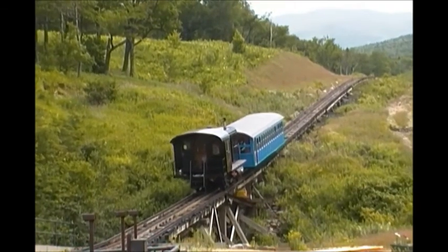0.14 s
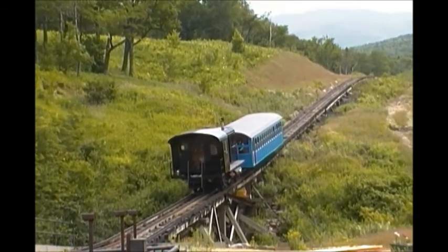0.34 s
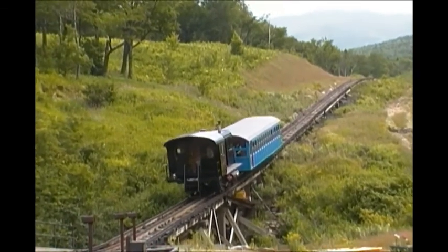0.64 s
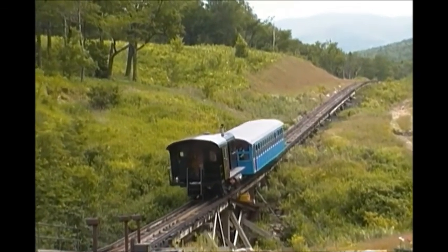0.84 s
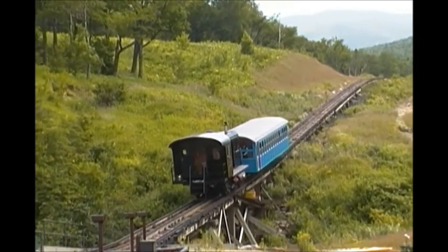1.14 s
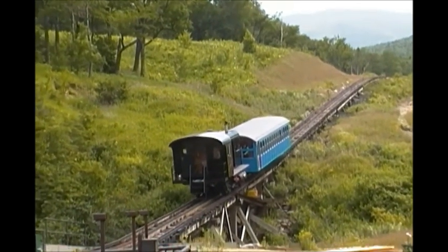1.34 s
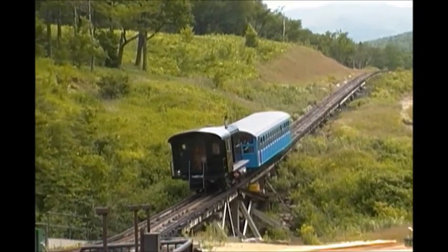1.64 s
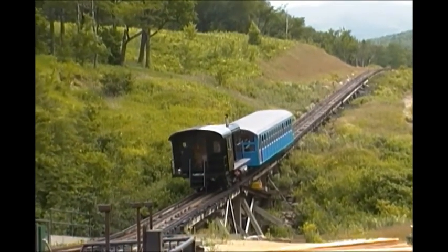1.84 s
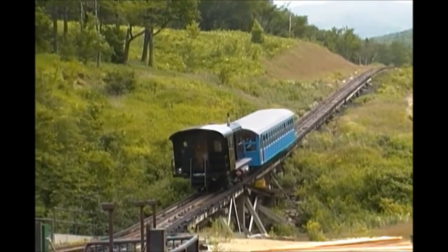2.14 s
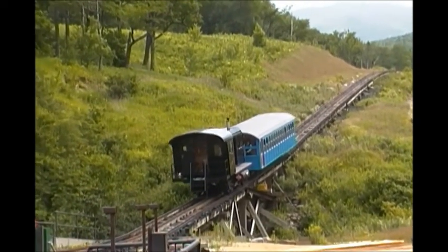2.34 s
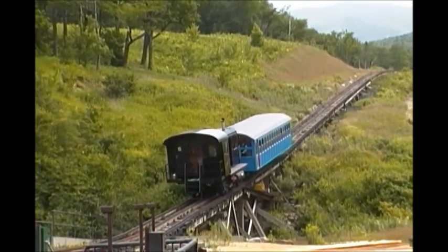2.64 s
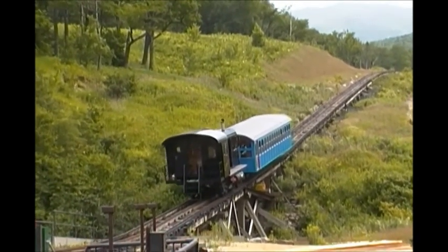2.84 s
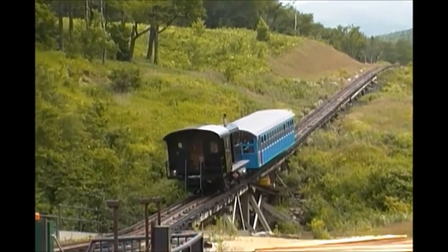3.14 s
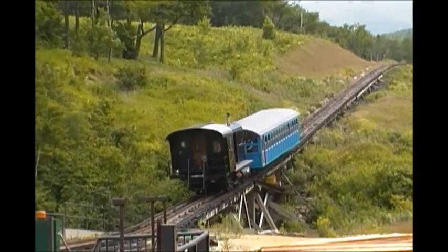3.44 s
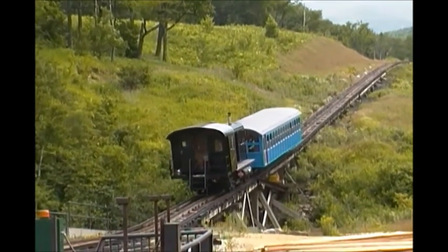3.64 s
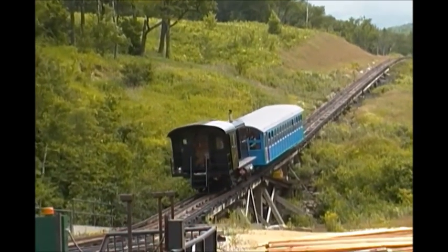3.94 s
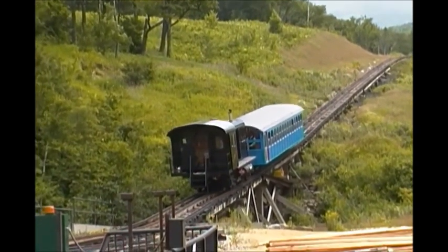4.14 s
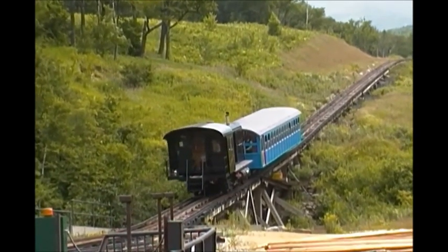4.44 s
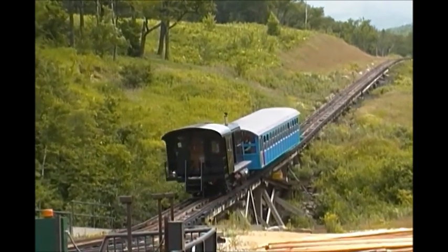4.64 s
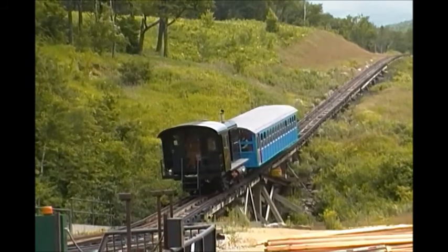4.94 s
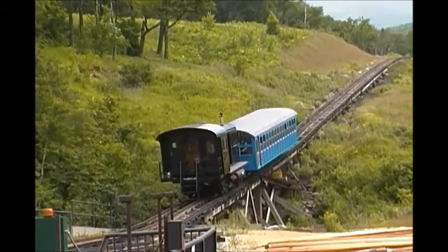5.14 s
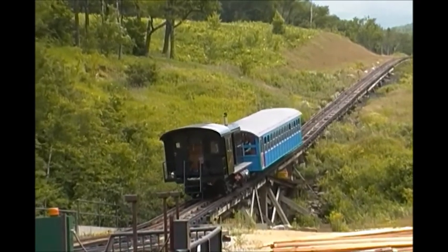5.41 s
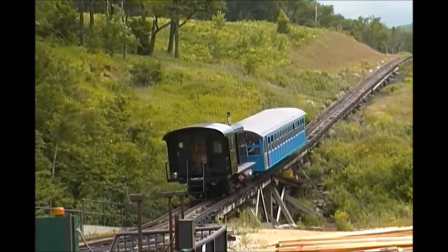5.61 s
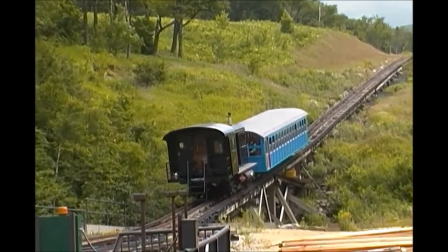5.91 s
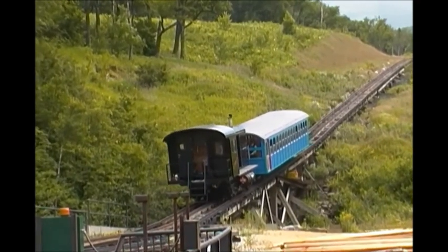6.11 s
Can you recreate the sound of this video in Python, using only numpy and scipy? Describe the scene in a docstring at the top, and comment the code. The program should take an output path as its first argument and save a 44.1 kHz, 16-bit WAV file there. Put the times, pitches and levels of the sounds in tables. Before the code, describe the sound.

Outdoors beside a hillside track, a diesel rack engine and coach creep downhill. A constant mid-range roar full of fine cog rattle sits over low rumble and a humming engine. Steel parts ping, loose metal jangles briefly and compressed air hisses in puffs. The roar grows fuller after the middle while the engine note sinks slightly. Stereo microphones at some distance, with small quick level dips and left-right shifts.

```python
"""Rack train on a trestle

A diesel rack locomotive and its coach creep down a timber trestle some way off, outdoors.
Sine waves locked to one shaft make the engine, fan and pump; others make an idling engine and singing gears.
Shaped noise makes the roar of cooling air, the low rumble, jangling metal and puffs of vented air.
Random knocks on ringing steel make the cog rattle, and single steel parts ping over it."""
import sys
import numpy as np
from scipy import signal
from scipy.fft import rfft, irfft, next_fast_len
from scipy.io import wavfile
from scipy.ndimage import uniform_filter1d, map_coordinates

SR = 44100
rng = np.random.default_rng(int(sys.argv[2]) if len(sys.argv) > 2 else 0)


def linear_from_db(decibels):
    """Turn decibels (scalar or array-like) into linear amplitude factors; 0 gives 1."""
    return 10 ** (np.asarray(decibels, float) / 20)


def unload_wav(signal):
    """Save mono or channel-first audio to the path in sys.argv[1] as 16-bit WAV at rate SR, clipped to [-1, 1]."""
    wavfile.write(
        sys.argv[1],
        SR,
        np.round(np.clip(np.atleast_2d(signal).T, -1, 1) * 32767).astype(np.int16),
    )


N = 276507  # length in samples


def unit(x):
    """Scale to an rms of 1."""
    return x / np.sqrt(np.mean(x ** 2) + 1e-20)


def clock():
    """The time of every sample in seconds."""
    return np.arange(N) / SR


def along(points, hz):
    """Read a table of (Hz, value) points on a logarithmic frequency axis."""
    f, v = np.transpose(points)
    return np.interp(np.log(hz + 1), np.log(f + 1), v)


def curves(rows):
    """Join the rows by straight lines: one value per sample for each column after the time."""
    s, *columns = np.transpose(rows)
    return [np.interp(clock(), s, column) for column in columns]


def wobble(rate):
    """A smooth random curve through this many random points a second."""
    points = rng.standard_normal(int(N * rate / SR) + 4)
    return map_coordinates(points, [np.arange(N) * rate / SR])


def filtered(x, response):
    """Multiply the spectrum of x by a function of frequency."""
    m = next_fast_len(N + SR // 2)
    gain = response(np.fft.rfftfreq(m, 1 / SR))
    return irfft(rfft(x, m) * gain, m)[..., :N]


# How alike left and right are. Each row: frequency in Hz, likeness (1 is identical, 0 unrelated).
LIKENESS = [(30, 0.44), (70, 0.93), (150, 0.98), (1200, 0.99), (2500, 0.96), (4000, 0.92), (6000, 0.67),
            (9000, 0.2)]


def spread(pair, spectrum):
    """Colour two unrelated signals and mix them into a left and right of the wanted likeness, rms 1."""
    def response(hz):
        turn = np.arccos(np.clip(along(LIKENESS, hz), -1, 1)) / 2
        return linear_from_db(along(spectrum, hz)) * [np.cos(turn), np.sin(turn)]

    mid, side = filtered(pair, response)
    return unit(np.array([mid + side, mid - side]))


def rush(spectrum, patchy_db):
    """Stereo noise of rms 1, with patches in time and frequency of random gain."""
    z = signal.stft(rng.standard_normal((2, N)), nperseg=512)[2]
    field = rng.standard_normal(z.shape[1:])
    field = uniform_filter1d(field, size=8, axis=0)
    field = uniform_filter1d(field, size=12, axis=1)
    patchy = signal.istft(z * linear_from_db(patchy_db * unit(field)), nperseg=512)[1]
    return spread(patchy[:, :N], spectrum)


def tones(rate_hz, orders, levels_db, waver_db, drift):
    """Sines at multiples of a rate, wavering in level and phase (drift in radians), left and right a little apart."""
    turns = np.cumsum(rate_hz) / SR
    total = 0
    for order, db in zip(orders, levels_db):
        level = np.sqrt(2) * linear_from_db(db + waver_db * wobble(6))
        phase = 2 * np.pi * (order * turns + rng.random()) + drift * wobble(5)
        apart = np.outer([1, -1], 0.084 * wobble(2.8))
        total = total + level * np.sin(phase + apart)
    return total


# Colour of the rumble. Each row: frequency in Hz, relative level in dB.
RUMBLE_COLOUR = [(12, -9), (25, -7), (33, -8.5), (48, -1.5), (60, -1), (110, 2), (200, 1.5), (240, -2),
                 (305, -3.5), (325, -7), (420, -9.5), (560, -40), (900, -120)]


def rumble():
    """Wheels and the timber trestle drone as low noise that swings slowly in level."""
    level_db, swing_db = -19.5, 1.1
    return linear_from_db(level_db + swing_db * wobble(3.83)) * rush(RUMBLE_COLOUR, patchy_db=0.5)


# Strength of the idling engine. Each row: time in seconds, change in dB.
IDLER_CHANGE = [(0, 2), (.7, 1), (2.7, -1.5), (5, 1), (5.7, -2), (6.27, 1)]
# Its harmonics 1, 2, and so on: level of each in dB, before that change.
IDLER_HARMONICS_DB = [-33, -25.5, -34.5, -33.5, -52, -34.5]


def idling_engine():
    """A second engine near by keeps its own steady pace and sounds as a row of harmonics."""
    rate_hz = np.full(N, 36.47)
    orders = np.arange(len(IDLER_HARMONICS_DB)) + 1
    return linear_from_db(curves(IDLER_CHANGE)[0]) * tones(rate_hz, orders, IDLER_HARMONICS_DB, waver_db=3.0, drift=0.4)


# The steady air leak. Each row: time in seconds, hiss level in dB.
LEAK_LEVEL = [(0, -42), (.6, -42.5), (1.5, -38), (3.35, -39), (3.6, -39.5), (6.27, -38.5)]
# Puffs of vented air. Each row: start in seconds, hold in seconds, hiss level in dB, sizzle over hiss in dB.
PUFFS = [(0.714, .3, -43.5, -4.5), (1.62, .07, -39.5, -5), (2.057, .5, -37.5, -3), (3.52, .12, -44, -13),
         (4.42, 0.04, -42, -6), (4.656, .25, -40.5, -4), (5.103, 0.14, -43, -6.5), (5.9, 0.15, -39.5, -15)]
# Colour of the hiss. Each row: frequency in Hz, relative level in dB.
HISS_COLOUR = [(2500, -120), (5200, -3.5), (6000, -5.5), (6500, -0.5), (7300, 2.5), (8300, -4.5),
               (9200, -12), (10200, -40), (16000, -120)]
# Colour of the higher sizzle. Each row: frequency in Hz, relative level in dB.
SIZZLE_COLOUR = [(5000, -120), (8000, -3.5), (9000, 0), (10000, 1.5), (10800, -19), (11500, -29),
                 (16000, -120)]


def air():
    """Compressed air leaks and vents in puffs as bright, wide noise, each puff with its own share of sizzle."""
    t = clock()
    rise_s, fall_s, leak_sizzle_db = 0.038, 0.068, -14.5
    leak = linear_from_db(curves(LEAK_LEVEL)[0])
    # unrelated noises add by power
    hiss_power = leak ** 2
    sizzle_power = (linear_from_db(leak_sizzle_db) * leak) ** 2
    for s, hold, db, over_db in PUFFS:
        puff = np.clip((t - s) / rise_s, 0, 1) * np.exp(-np.maximum(t - s - hold, 0) / fall_s)
        hiss_power = hiss_power + (linear_from_db(db) * puff) ** 2
        sizzle_power = sizzle_power + (linear_from_db(db + over_db) * puff) ** 2
    hiss = np.sqrt(hiss_power) * rush(HISS_COLOUR, patchy_db=1.4)
    sizzle = linear_from_db(1.3 * wobble(8)) * np.sqrt(sizzle_power) * rush(SIZZLE_COLOUR, patchy_db=3.0)
    return linear_from_db(0.63 * wobble(10)) * (hiss + sizzle)


# Bursts of loose metal shaking. Each row: middle in seconds, level in dB, length in seconds.
JANGLE_BURSTS = [(0.44, -29, 0.012), (1.67, -39, .015), (2.089, -25.5, .02), (3.956, -26.5, 0.016),
                 (5.2, -24.5, .025), (5.34, -26, 0.023), (5.941, -20.5, 0.0098)]
# Colour of the bursts. Each row: frequency in Hz, relative level in dB.
JANGLE_COLOUR = [(800, -120), (1500, -4.5), (3000, -1), (5000, -5), (7500, -13.5), (9500, -22.5),
                 (14000, -120)]


def jangles():
    """Loose metal shakes: each burst of noise swells and fades within a few hundredths of a second."""
    t = clock()
    swell = sum(linear_from_db(db) * np.exp(-((t - s) / length) ** 2) for s, db, length in JANGLE_BURSTS)
    return swell * rush(JANGLE_COLOUR, patchy_db=4.0)


# Single steel parts that ring. Each row: start in seconds, frequency in Hz, level in dB.
PING_PARTS = [(.025, 2660, -20), (.35, 2650, -21), (.745, 2680, -16.5), (3.61, 624, -14.5),
              (3.69, 4200, -27.5), (3.74, 579, -16), (4.03, 4200, -28), (4.925, 4205, -25),
              (5.13, 4200, -25), (5.17, 1295, -20)]
# How long they ring. Each row: frequency in Hz, time to fall by 60 dB in seconds.
PING_RING = [(600, .33), (2600, 0.12), (4200, 0.28)]


def pings():
    """Each steel part starts softly at this distance and rings as a fading, slightly unsteady sine."""
    t = clock()
    out = np.zeros(N)
    for s, hz, db in PING_PARTS:
        age = np.maximum(t - s, 0)
        fade = linear_from_db(db - 60 * age / along(PING_RING, hz))
        soft_start = 1 - np.exp(-age / 0.0034)
        out += fade * soft_start * np.sin(2 * np.pi * hz * t + 1.4 * wobble(30))
    return out


# Two singing gear pairs. Each row: time in seconds, level of the first in dB, level of the second in dB.
GEAR_LEVELS = [(0, -33, -59), (2, -30, -62), (3.6, -37.5, -59), (5.7, -46, -47), (5.85, -51, -25.5),
               (6.27, -53, -30)]
# Fast random pitch scatter in Hz, first gear pair then second.
GEAR_SCATTER_HZ = [7.05, 12]


def gears():
    """Gears sing as fuzzy tones, since tooth contact varies; one fades and later the other comes."""
    out = 0
    for hz, scatter_hz, db in zip((540.3, 704), GEAR_SCATTER_HZ, curves(GEAR_LEVELS)):
        pitch = hz + scatter_hz * wobble(30)
        out = out + linear_from_db(db + 2.5 * wobble(20)) * tones(pitch, [1], [0], waver_db=3.0, drift=.8)
    return out


# Ringing tones of the panels and rack. Each row: frequency in Hz, relative level in dB,
# time to fall by 60 dB in seconds.
STEEL_MODES = [(553.5, -3, 0.12), (629, -3.5, 0.11), (1027, -4.5, .08), (1104, -2.5, 0.08),
               (1348, -3, 0.15), (1599, 0.5, 0.064), (2035, -8, .06), (2650, -5.5, 0.065),
               (3094, -5.5, .05), (3610, -20, 0.036), (4200, -13, 0.073), (4810, -13.5, 0.089)]


def rattle(per_second, scatter_db):
    """Cog teeth, pins and loose panels knock: each steel tone is struck at random times and strengths."""
    t = np.arange(SR // 5) / SR
    out = np.zeros((2, N))
    for hz, db, t60 in STEEL_MODES:
        strength = linear_from_db(scatter_db * rng.standard_normal((2, N)))
        knocks = (rng.random((2, N)) < per_second / SR) * strength
        ring = linear_from_db(db - 60 * t / t60) * np.sin(2 * np.pi * hz * t)
        out += signal.fftconvolve(knocks, [ring], axes=1)[:, :N]
    return spread(out, [(100, 0)])  # no extra colour


# Strength of the roar. Each row: time in seconds, level in dB.
ROAR_LEVEL = [(0, -19), (.3, -18), (.45, -16.5), (.56, -19.5), (.75, -18.5), (1.02, -16), (1.25, -18.5),
              (1.7, -15.5), (1.9, -18), (2.15, -15.5), (2.5, -16), (3.1, -16), (3.35, -18), (3.6, -15),
              (3.85, -18.5), (3.96, -15), (4.2, -17.5), (4.9, -17), (5.22, -13.5), (5.4, -16), (5.72, -17),
              (5.86, -15), (6.13, -18), (6.27, -17.5)]
# Colour of the roar while the train is farther off. Each row: frequency in Hz, relative level in dB.
FAR_COLOUR = [(250, -33), (420, -12.5), (490, -10), (547, -5), (640, -4.5), (850, -12.5), (1020, -4.5),
              (1250, -9), (1700, -8), (1900, -13.5), (2080, -11), (2340, -15.5), (2690, -13), (2900, -15),
              (3600, -17.5), (4450, -21.5), (5050, -23.5), (5550, -28.5), (5800, -30), (6500, -33),
              (8450, -43), (14300, -120)]
# Colour of the roar when it is nearer. Each row: frequency in Hz, relative level in dB.
NEAR_COLOUR = [(250, -20.5), (420, -4.5), (470, -4.5), (600, -3), (690, -2), (816, -7.5), (960, -1.5),
               (1300, -5), (1850, -8), (2110, -5.5), (2340, -12), (2560, -8.5), (2850, -12), (3600, -14),
               (4500, -18.5), (5050, -20), (5550, -27), (5800, -26.5), (6500, -27.5), (8450, -40.5),
               (14300, -120)]
# The change between them. Each row: time in seconds, share of the nearer colour (0 to 1).
NEAR_SHARE = [(3.4, 0.0055), (4.8, 1)]
# Treble of the roar. Each row: time in seconds, change in dB.
TREBLE_CHANGE = [(0, -1), (.8, 1), (1.3, 0), (2.5, .5), (3.3, -1.5), (3.6, 0), (4.2, 1.5), (5.2, 0),
                 (6.27, 1.5)]


def roar():
    """Cooling air and gear noise roar through the body, with the rattle; the colour shifts as it nears."""
    near = np.clip(curves(NEAR_SHARE)[0], 0, 1)
    far_body = np.sqrt(1 - near) * rush(FAR_COLOUR, patchy_db=0.14)
    near_body = np.sqrt(near) * rush(NEAR_COLOUR, patchy_db=0.3)
    whole = unit(far_body + near_body + linear_from_db(-8.5) * rattle(per_second=60, scatter_db=3.5))
    treble = filtered(whole, lambda hz: hz ** 4 / (hz ** 4 + 2600 ** 4))
    shake_db = 0.37 * wobble(16) + 0.78 * wobble(8)  # the roar and rattle shudder together
    treble_extra = (linear_from_db(curves(TREBLE_CHANGE)[0]) - 1) * treble
    return linear_from_db(curves(ROAR_LEVEL)[0] + shake_db) * (whole + treble_extra)


# Engine speed. Each row: time in seconds, firing rate in Hz.
FIRING_RATE = [(0, 94.4), (3.3, 94.4), (3.8, 93.6), (4.1, 92.7), (4.4, 91.2), (4.7, 90.1), (5, 89.5),
               (5.3, 89), (5.6, 88.7), (6.27, 88.4)]
# Load on the parts. Each row: time in seconds, then the change in dB of exhaust, fan, pump and pump overtones.
PART_LOAD = [(0, -2.5, -4.5, -0.5, -3), (2.3, -0.5, -3.5, 0.5, 2.5), (3.7, -2, 0, -2, 1.5),
             (4.5, -6.5, -3.5, -11.5, -19), (5.2, -6, -1.5, -5.5, -18), (6.27, -5.5, -4, -5.5, 0)]
# Exhaust tones as multiples of the firing rate.
EXHAUST_MULTIPLES = [8 / 9, 0.99, 14 / 9, 2, 8 / 3]
# Level of each exhaust tone in dB, before the load change.
EXHAUST_LEVELS_DB = [-35.5, -20, -33, -22, -30.5]
# Levels of the pump's harmonics 2, 3 and 4 in dB, before the load change.
PUMP_OVERTONES_DB = [-36, -36, -40.5]


def engine():
    """Exhaust beats, fan blades and pump pistons follow one shaft, so they all slow together."""
    firing, = curves(FIRING_RATE)
    exhaust_db, fan_db, pump_db, overtone_db = curves(PART_LOAD)
    fan_hz, pump_hz = 2.4455 * firing, 2.1755 * firing
    exhaust = linear_from_db(exhaust_db) * tones(firing, EXHAUST_MULTIPLES, EXHAUST_LEVELS_DB, waver_db=2.5, drift=.2)
    fan = linear_from_db(fan_db) * tones(fan_hz, [1], [-26], waver_db=2.5, drift=0.13)
    pump = linear_from_db(pump_db) * tones(pump_hz, [1], [-21], waver_db=2.0, drift=0.2)
    orders = np.arange(len(PUMP_OVERTONES_DB)) + 2
    overtones = linear_from_db(overtone_db) * tones(pump_hz, orders, PUMP_OVERTONES_DB, waver_db=1.6, drift=0.35)
    return exhaust + fan + pump + overtones


# Brief drops of the whole level. Each row: time in seconds, depth in dB.
LEVEL_DIPS = [(.83, 2.5), (1.389, 3), (1.74, 2.5), (2.39, 5), (2.58, 4.5), (2.822, 3), (4.0, 1.5),
              (5.226, 3.5)]


def dips():
    """The whole level drops at once and creeps back, mostly within about a tenth of a second."""
    t = clock()
    drop_db = sum(depth_db * (t >= s) * np.exp(-np.abs(t - s) / 0.063) for s, depth_db in LEVEL_DIPS)
    return linear_from_db(-drop_db)


# Lean of the whole sound. Each row: time in seconds, left minus right in dB.
LEAN = [(0.0, -4.5), (0.1, 3.5), (0.42, -2.0), (0.56, 5), (0.61, 0.5), (1.19, 0.5), (1.22, 2), (1.5, 0.0),
        (2.06, 1.5), (2.16, -2.0), (2.97, 2), (3.04, -2.0), (3.12, 0.5), (3.27, -0.5), (3.34, 3.5),
        (3.42, 0.0), (4.16, 1.5), (4.19, -1.5), (4.26, 3), (4.8, 3.0), (4.85, -0.5), (5.9, 3.0),
        (5.97, 0.0), (6.27, 3.0)]


def lean():
    """The whole sound leans to the left or right, sometimes quickly and sometimes slowly."""
    return linear_from_db(np.outer([.5, -.5], curves(LEAN)[0]))


def scene():
    """All sources together in the open air."""
    background = rumble() + idling_engine() + air()
    train = jangles() + pings() + gears() + roar() + engine()
    return lean() * dips() * (background + train)


# Difference between the two microphones. Each row: frequency in Hz, left minus right in dB.
MICROPHONE_TILT = [(40, -1.5), (220, -0.1), (810, 0), (2960, -0.5), (7000, 0.5), (9000, -4)]


def microphones(x):
    """Two slightly unequal microphones favour left or right by frequency."""
    return filtered(x, lambda hz: linear_from_db(np.outer([.5, -.5], along(MICROPHONE_TILT, hz))))


def band_limit(x):
    """A steep low-pass at the top of the band."""
    return signal.sosfilt(signal.butter(12, 11470, fs=SR, output="sos"), x)


def record(dry):
    """Two microphones feed an input that overloads softly."""
    x = microphones(dry)
    mix = x / (1 + np.abs(x / 1.2) ** 8) ** (1 / 8)
    return band_limit(mix)


dry = scene()
out = record(dry)
unload_wav(out)
```